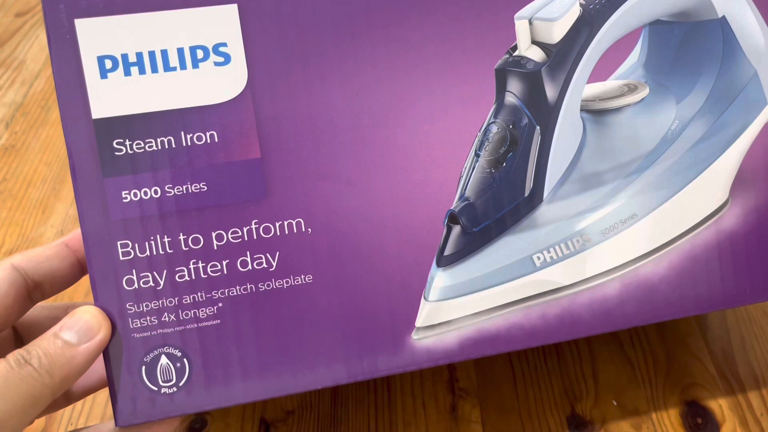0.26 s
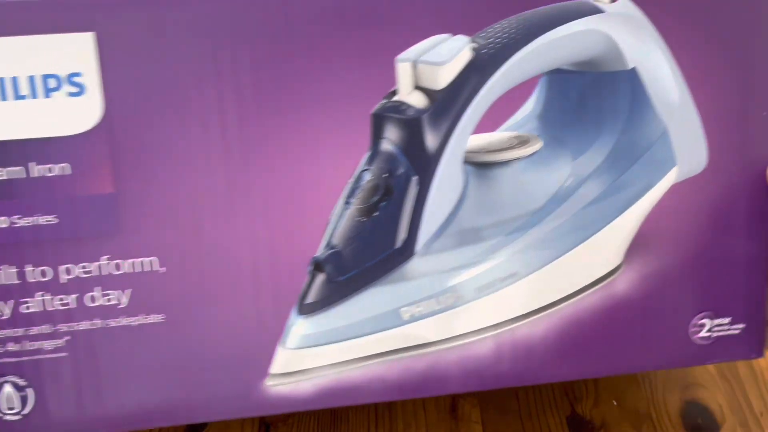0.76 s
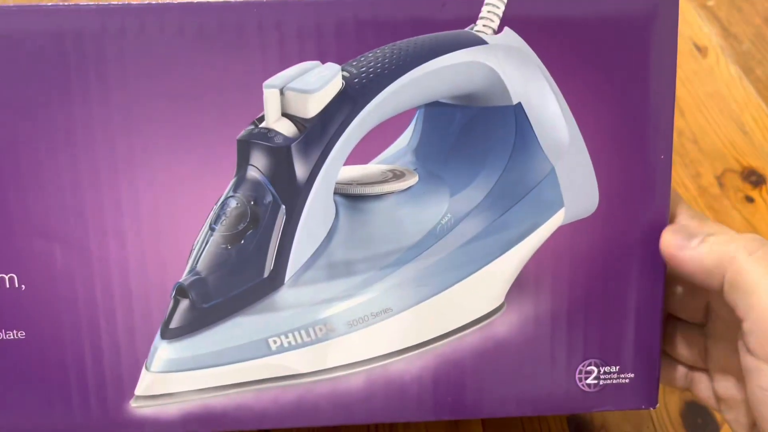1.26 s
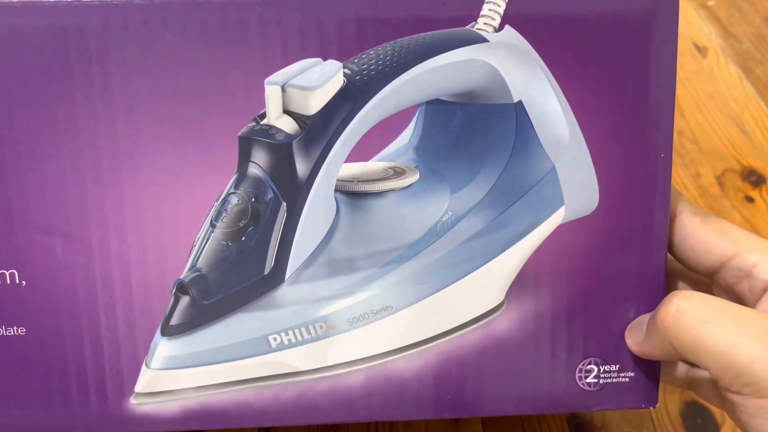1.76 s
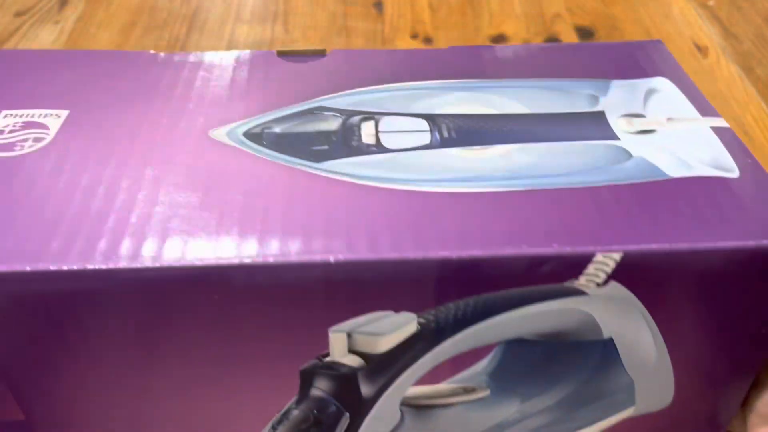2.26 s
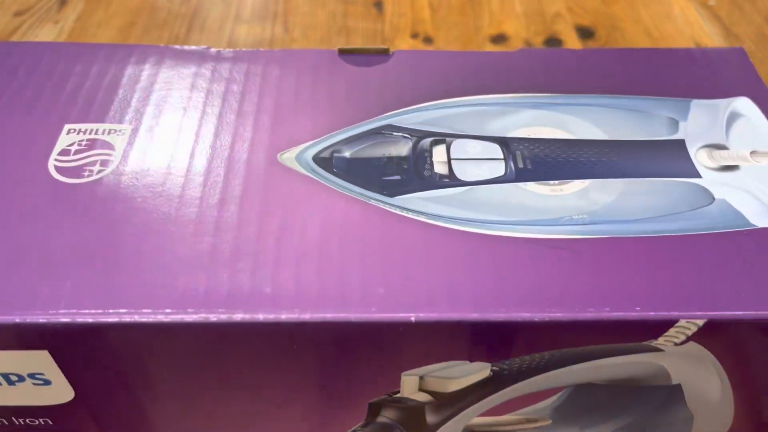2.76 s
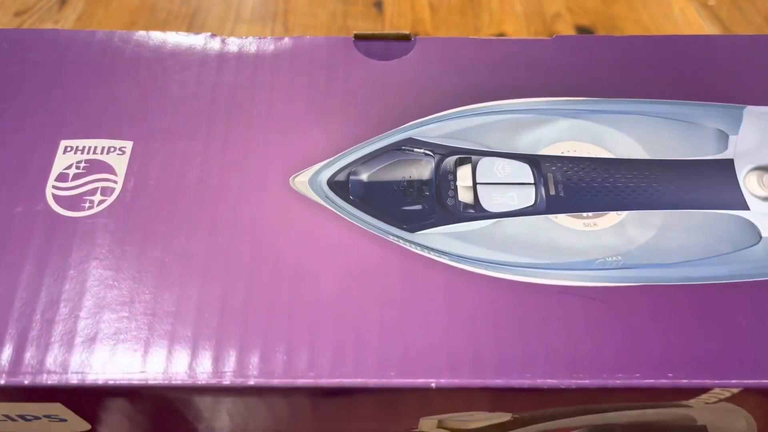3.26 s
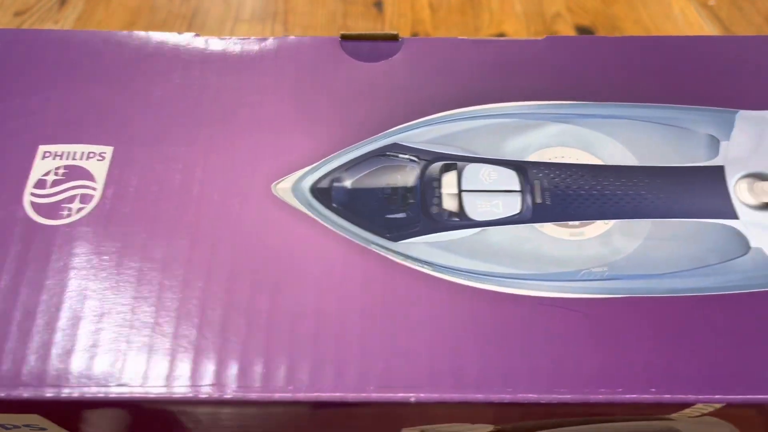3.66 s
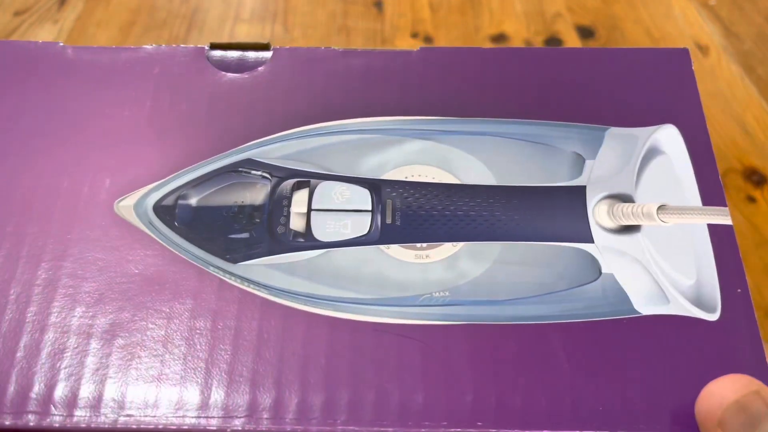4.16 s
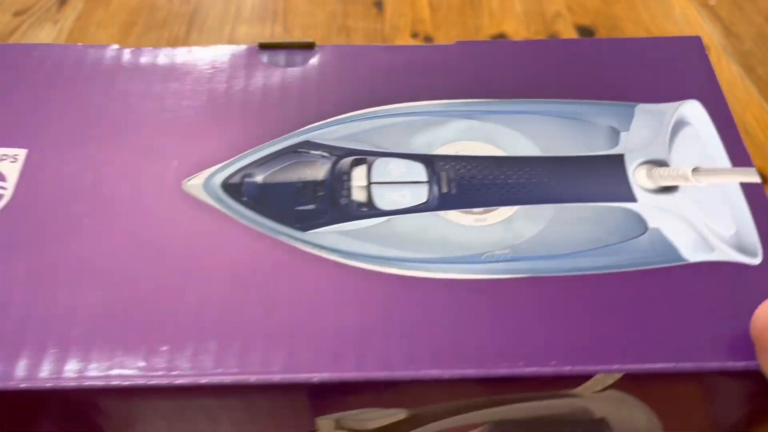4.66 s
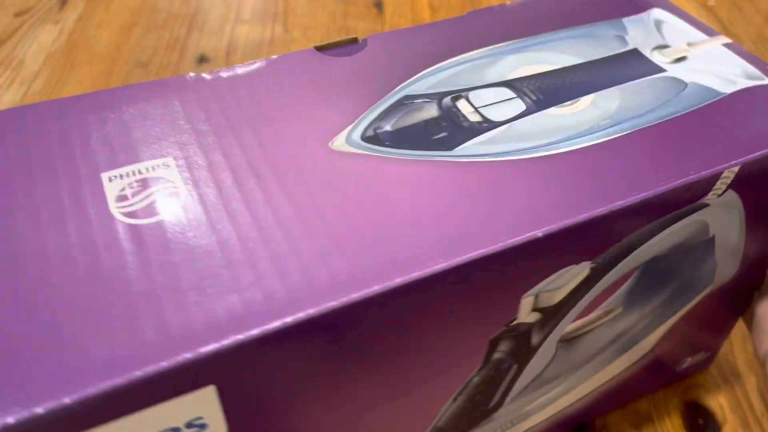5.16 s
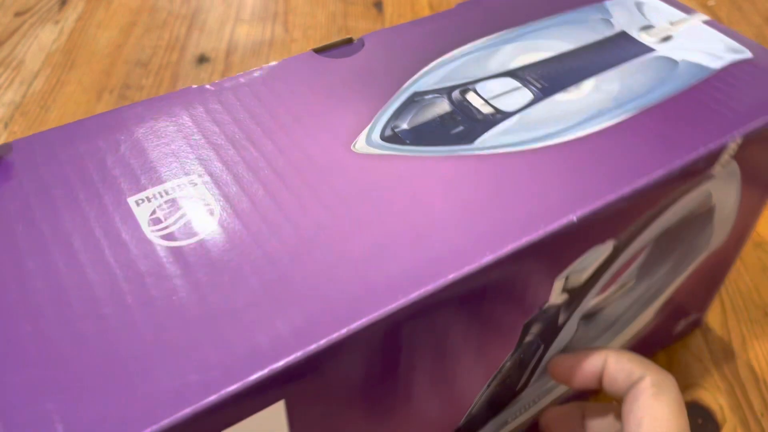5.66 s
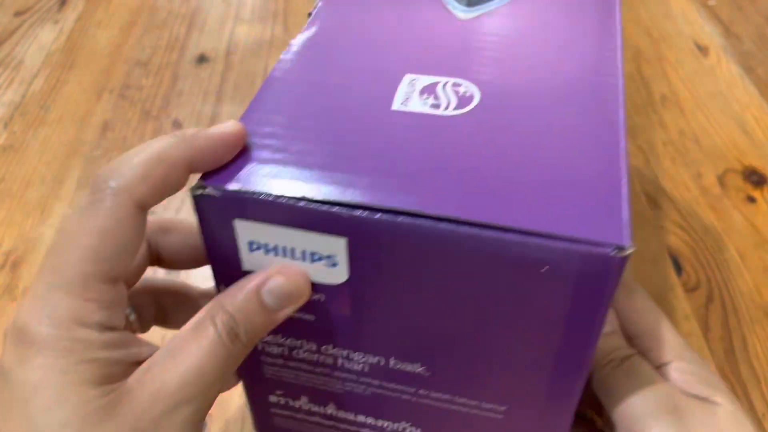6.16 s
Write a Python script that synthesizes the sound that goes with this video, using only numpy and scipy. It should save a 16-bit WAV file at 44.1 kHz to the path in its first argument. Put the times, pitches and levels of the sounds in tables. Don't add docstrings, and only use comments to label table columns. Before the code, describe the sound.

Close up in a quiet room with a faint fan hum, hands slide over a glossy cardboard box on a wooden table. Soft hissing strokes and low judders come first, separated by near-silent pauses with small pats. Later the strokes turn louder and rougher, with sharp clicks, sticky skin snaps and hollow panel thuds until the cut-off.

```python
import sys
import numpy as np
from scipy import signal
from scipy.fft import rfft, irfft
from scipy.io import wavfile
from scipy.ndimage import uniform_filter1d, map_coordinates

SR = 44100
rng = np.random.default_rng(int(sys.argv[2]) if len(sys.argv) > 2 else 0)


def store_pcm(level_fs):
    pcm = np.round(np.clip(level_fs, -1, 1) * 32767).astype(np.int16)
    wavfile.write(sys.argv[1], SR, np.atleast_2d(pcm).T)


def invert_db(x):
    u = np.asarray(x, float) / 20
    return 10 ** u


N = 282240
HZ = np.fft.rfftfreq(N, 1 / SR)
TIME = np.arange(N) / SR

# [f/Hz, level/dB]
SKIN = [(1200, -11), (2200, 0), (3500, -0.5), (5000, -5), (7200, -8.5), (8500, -14), (9700, -5.5),
        (11000, -12), (14000, -17), (16000, -21)]
# [f/Hz, width/Hz, level/dB]
BOARD = [(535, 125, -1), (653, 138, 1), (766, 173, 2.5), (966, 97, 3), (1024, 133, 2), (1357, 168, 0),
         (1690, 500, -5.5), (2370, 380, -15)]
# [f/Hz, width/Hz, level/dB]
PANEL = [(187.6, 14, 6.5), (262, 22.6, -2), (308.5, 29, -0.5), (396.3, 24.7, -3), (500, 44, -7)]
# [f/Hz, width/Hz, level/dB]
TABLE = [(60.9, 17.3, -0.5), (94.5, 15, 0.5), (130, 12, -8)]
# [f/Hz, width/Hz, level/dB]
HUM = [(51, 9.5, -59), (97.2, 8.6, -63), (147.6, 9.2, -64.5), (187.5, 6.1, -62.5), (245, 8.9, -73.5),
       (330.8, 8, -80.5)]
# [f/Hz, level/dB]
AIR = [(25, -27), (60, -2.5), (150, -10), (300, -20), (480, -28.5), (750, -24), (1050, -24.5),
       (1400, -15.5), (1750, -16), (2500, -38.5), (5000, -39), (7000, -47), (10000, -52), (16000, -60)]
# [f/Hz, likeness -1 to 1]
AIR_ALIKE = [(60, -0.23), (300, -0.63), (700, 0.24), (1400, -0.44), (3000, 0.32), (5500, 0.035),
             (8300, -0.71), (12000, 0.77), (15500, -.6)]
# [f/Hz, phase/rad]
PORT_LEAD = [(0, 0), (2000, 0), (2800, .8), (4800, .4), (6300, -.9), (7600, -2.65), (8500, -3.14),
             (9500, -3.6), (11000, -6.1), (13400, -6.5), (14900, -9.3), (16000, -9.5)]
# [f/Hz, left minus right/dB]
PORT_TILT = [(60, -3), (250, -1), (600, -4.5), (1200, 1.8), (2700, -.6), (4500, 6), (8000, 2.5),
             (15000, -1.5)]
# [f/Hz, level/dB]
ROOM_DB = [(60, -15), (300, -12), (700, -0.5), (3000, -9.5), (6000, -4.5), (8000, -13.5), (16000, -16)]
# [t/s, rub level/dB]
STROKES = [
    [(0.44, -96), (0.506, -96), (0.534, -79), (0.644, -70.5), (0.772, -74), (1.088, -81), (1.192, -93)],
    [(1.198, -77), (1.228, -80), (1.27, -105)],
    [(1.83, -75), (1.9, -78), (1.94, -79.5), (2.038, -70), (2.13, -73)],
    [(2.13, -68.5), (2.28, -67.5), (2.496, -68.5), (2.584, -70), (2.66, -74)],
    [(2.66, -74), (2.798, -71), (2.944, -77.5), (3.07, -71), (3.154, -76.5), (3.2, -98.5)],
    [(3.6, -91), (3.658, -78.5), (3.79, -73.5), (4.026, -74.5), (4.15, -86.5), (4.19, -96)],
    [(4.49, -71), (4.532, -73), (4.596, -65.5), (4.704, -64), (4.74, -56.5), (5.0, -64)],
    [(5.0, -59), (5.05, -61), (5.206, -61), (5.256, -61.5), (5.324, -63.5), (5.35, -51.5), (5.385, -79),
     (5.44, -74.5), (5.48, -104)],
    [(5.56, -85), (5.6, -61), (5.654, -67), (5.734, -57), (5.8, -55.5), (6.0, -56), (6.064, -61)],
    [(6.064, -63), (6.18, -59), (6.24, -61), (6.26, -65), (6.4, -66)],
]
# [skin gloss/dB, edge on wood/dB, panel shudder/dB]
GRIPS = [(-7, -65, -57.5), (-2, -63, -61), (-2, -65, -55), (-10.5, -69.5, -65), (-6, -70.5, -61),
         (-1.5, -72.5, -57), (-8.5, -70.5, -59.5), (-8, -68.5, -60.5), (-7.5, -64.5, -55),
         (-6.5, -61.5, -54)]
# [t/s, length/s, panel level/dB, panel f/Hz]
JUDDERS = [(0.9, 0.11, -53, 97), (0.64, 0.07, -50, 95), (0.7, 0.027, -46, 100), (0.774, 0.11, -39, 101),
           (1.84, 0.072, -54.5, 427), (5.06, 0.057, -53, 383), (5.331, 0.043, -43.5, 337),
           (5.884, 0.11, -47, 283), (6.167, 0.075, -42, 390)]
# [t/s, share of the sound]
FACE = [(0.5, 0.35), (2.5, 0.084), (2.75, 0.21), (4.1, 0.42), (4.55, 0.1), (4.76, 0.13), (4.95, 0.29),
        (5.1, 0.12), (6.4, 0.025)]
# [t/s,
# length/s, level/dB, f/Hz]
HOLLOWS = [(0.59, 0.18, -69, 1130), (5.1, .005, -52, 3900), (5.5896, 0.0036, -36.5, 2300),
           (4.652, .004, -58, 4800), (1.872, 0.013, -57, 980), (6.076, 0.017, -49.5, 1060),
           (1.203, 0.01, -77, 2500), (6.222, 0.021, -64, 4000), (2.55, .25, -75, 3500),
           (5.8, 0.021, -63, 2250), (4.58, 0.043, -69, 3550), (1.9, 0.095, -78, 4600), (2, 0.33, -81, 3300),
           (2.76, 0.41, -81, 2650), (4.54, .07, -74, 2460), (4.7, 0.18, -63.5, 2540),
           (4.725, 0.106, -63, 1670), (4.7, 0.28, -76, 6400), (4.6, 0.064, -76, 2830),
           (2.06, 0.088, -59, 810), (5.211, .008, -54, 1400), (5.4225, .003, -61, 6500),
           (5.2485, .003, -54, 3600), (.68, .1, -66, 600), (.58, 0.17, -78.5, 2880), (2.2, .4, -79.5, 3670),
           (4.9, 0.027, -64, 6500), (5.341, .022, -58, 3000), (5.285, .075, -65, 13700),
           (5.243, 0.052, -53.5, 800), (5.79, 0.29, -61, 1340), (6.185, 0.079, -54.5, 1300)]
# [t/s, panel level/dB, panel f/Hz, crack level/dB]
PATS = [(0.449, -53.5, 228, -57.5), (0.512, -42, 230, -53.5), (1.009, -39, 334, -52.5),
        (1.129, -49.5, 244, -52.5), (1.653, -47.5, 245, -64), (1.701, -49.5, 320, -82),
        (1.839, -41, 380, -48.5), (1.888, -39.5, 428, -64), (1.929, -34.5, 245, -50.5),
        (2.128, -51, 307, -45), (2.686, -36.5, 259, -54.5), (2.79, -37.5, 282, -74), (2.879, -44, 230, -64),
        (2.927, -40.5, 382, -72), (3.799, -35.5, 281, -51.5), (4.414, -60, 240, -80),
        (5.096, -39.5, 414, -54), (5.339, -39, 310, -50), (5.532, -51, 230, -68), (5.945, -32.5, 435, -43),
        (6.077, -25.5, 437, -37), (6.087, -45, 467, -49), (6.192, -40, 383, -39), (6.236, -44, 350, -49),
        (6.394, -49, 237, -49)]
# [t/s, panel level/dB, panel f/Hz, tick level/dB]
CLICKS = [(1.839, -50, 300, -63), (6.226, -52, 380, -62), (6.239, -49, 350, -60), (0.76, -42, 270, -61.5),
          (1.205, -49.5, 480, -73), (1.875, -37, 312, -55.5), (2.283, -46, 252, -60),
          (2.953, -50, 320, -60), (3.662, -51.5, 505, -63.5), (4.492, -44, 238, -65),
          (4.6518, -38, 384, -50.5), (4.846, -31.5, 343, -54.5), (4.95, -26, 339, -52),
          (5.0425, -38.5, 507, -56), (5.055, -30.5, 357, -48.5), (5.168, -37.5, 317, -52.5),
          (5.212, -46, 398, -59), (5.25, -38.5, 356, -57), (5.352, -47, 320, -53), (5.422, -71, 302, -69),
          (5.483, -68, 234, -84), (5.564, -36.5, 305, -56.5), (5.588, -33, 403, -49),
          (5.5912, -28, 407, -41.5), (5.597, -46, 313, -56), (5.904, -34.5, 245, -50),
          (5.984, -24.5, 320, -43.5)]
# [t/s, rumble level/dB]
DRAG = [(0, -60), (0.45, -57), (0.64, -43.5), (0.89, -41), (1.1, -58.5), (1.9, -60.5), (2.14, -51),
        (2.76, -55), (2.91, -48.5), (3.1, -57), (3.8, -53.5), (4.45, -60), (4.87, -47), (5.3, -50),
        (5.52, -54), (5.64, -40.5), (5.9, -48), (6.2, -42.5), (6.4, -53.5)]
# [t/s, length/s, level/dB, centre f/Hz]
LURCHES = [(0.483, 0.062, -56.5, 262), (2.073, 0.12, -47.5, 320), (2.687, 0.043, -57, 420),
           (3.721, 0.078, -54, 300), (3.807, 0.053, -50.5, 250), (0.604, .3, -54, 238),
           (5.334, 0.061, -50.5, 320), (4.834, 0.068, -48.5, 224), (4.953, .04, -47, 197),
           (5.044, 0.12, -45.5, 248), (5.241, 0.059, -47, 330), (5.655, 0.11, -51, 262),
           (6.14, 0.13, -45.5, 295)]
# [t/s, length/s, peak level/dB, f/Hz]
SWELLS = [(0.637, .03, -41.5, 98), (0.68, 0.015, -41, 208), (.761, 0.018, -52, 556),
          (0.799, 0.025, -33, 106.5), (.918, 0.017, -47, 120), (1.01, 0.015, -45.5, 436),
          (1.8395, .012, -39, 330), (1.93, .01, -38, 300), (3.66, .01, -50, 620), (3.799, .018, -41, 260),
          (5.339, .022, -38, 310), (4.651, 0.0097, -39.5, 534), (5.21, 0.018, -48, 525),
          (5.339, .016, -48.5, 527), (5.588, 0.012, -33.5, 548), (5.589, 0.0064, -40, 1060),
          (5.612, 0.029, -39.5, 239), (5.608, 0.032, -38.5, 141), (6.095, 0.011, -41.5, 500),
          (6.178, 0.032, -44.5, 565), (6.225, 0.021, -45, 902), (2.09, .032, -38, 339),
          (2.091, 0.03, -37.5, 216), (2.124, 0.019, -39, 190), (2.128, .008, -46.5, 817),
          (2.142, 0.013, -37, 300), (2.15, 0.013, -42, 181), (2.164, 0.016, -40, 237),
          (4.654, 0.014, -34.5, 394), (4.852, 0.021, -38.5, 224), (5.271, 0.016, -41, 333),
          (5.288, 0.017, -42, 330), (5.352, 0.017, -39, 298), (5.5923, .0155, -20.5, 318),
          (5.673, 0.013, -43.5, 328), (5.73, 0.014, -41, 202), (5.774, 0.014, -42, 253),
          (5.828, .014, -41.5, 360), (6.022, 0.014, -41, 256), (6.083, 0.015, -34.5, 135),
          (6.11, 0.017, -42, 120), (6.138, .02, -43, 280), (6.174, 0.026, -28, 400),
          (6.176, 0.034, -32.5, 211), (6.206, 0.012, -30, 400), (6.224, 0.027, -31.5, 390),
          (6.236, 0.029, -37, 169), (6.285, 0.017, -44.5, 302), (6.355, 0.017, -47, 260)]
# [t/s, peak level/dB, ring f/Hz]
SNAPS = [(1.2034, -63, 2550), (1.838, -54, 2320), (1.871, -47, 2620), (2.953, -50.5, 2520),
         (3.6624, -61, 2920), (3.7394, -63, 3350), (4.4914, -48, 4500), (4.5865, -49, 2600),
         (4.6509, -47, 5050), (4.9044, -51, 6600), (4.9831, -51, 2050), (5.019, -46, 3570),
         (5.0419, -41, 2130), (5.2489, -51, 2110), (5.3418, -43, 2380), (5.3524, -46, 2020),
         (5.4114, -64, 2300), (5.4229, -60, 3070), (5.492, -68, 2040), (5.5628, -46, 5260),
         (5.5879, -33.5, 2300), (5.7139, -47, 3350), (5.896, -36, 2410)]

AIR_DB = -64.5
ROOM_T60_S = 0.19
FACE_LAG_S = .0009
PAT_TICK_DB, CLICK_CRACK_DB = -31, 4.5
PAT_DULL_HZ, RING_S = 1220, 0.039
SCUFF_DB, SCUFF_S = -16, .004
EDGE_PER_DB, SHUDDER_PER_DB, USUAL_DB = 0.7, 0.6, -68.5
SWELL_LATE = 1.13
SNAP_S, SNAP_DB, SNAP_EDGE = 0.00075, -0.5, 1.1
HOLLOW_PER_DB = .012


def unit(x):
    return x / np.sqrt(np.mean(x ** 2))


def read(table):
    hz, value = np.transpose(table)
    return np.interp(np.log(HZ + 1), np.log(hz + 1), value)


def curves(table):
    s, *columns = np.transpose(table)
    return [np.interp(TIME, s, column) for column in columns]


def ring(x, modes, flip=-1):
    s = 1j * np.fft.rfftfreq(x.shape[-1], 1 / SR)
    gain = 0
    for k, (hz, width, db) in enumerate(modes):
        gain = gain + flip ** k * invert_db(db) * s * width / (s * s + s * width + hz * hz)
    return irfft(rfft(x) * gain, x.shape[-1])


def walk(rate):
    k = int(SR / rate)
    steps = np.repeat(rng.standard_normal(N // k + 1), k)
    return 0.88 * uniform_filter1d(uniform_filter1d(steps, k), k)[:N]


def slips(rate, spread_db, grip_db):
    slip = rng.random(N) < rate / SR
    strength = invert_db(spread_db * np.minimum(rng.exponential(size=N), 5))
    return slip * strength * rng.standard_normal(N) * invert_db(grip_db * walk(30))


def add(out, push, s, length, db, modes, fade_s, bend=None):
    at = slice(int(s * SR), int((s + length) * SR))
    t = TIME[at] - s
    rung = unit(ring(push[at], modes))
    if bend is not None:
        place = np.cumsum(1 + bend[at] - bend[at].mean())
        rung = map_coordinates(rung, [place], mode="mirror")
    out[at] += invert_db(db) * np.clip(np.minimum(t, length - t) / fade_s, 0, 1) * rung


def fan():
    alike = np.clip(read(AIR_ALIKE), -.99, .99)
    noise = rfft(rng.standard_normal((2, N))) * invert_db(read(AIR))
    mid, side = noise * np.sqrt([1 + alike, 1 - alike])
    air = invert_db(AIR_DB) * unit(irfft(np.array([mid + side, mid - side]), N))
    push = rng.standard_normal((3, N))
    push = push[0] + 0.17 * push[1:]
    hum = 0
    for hz, width, db in HUM:
        tone = ring(ring(push, [(hz, width, 0)]), [(hz, 3 * width, 0)])
        hum = hum + invert_db(db) * unit(tone)
    return air + hum * invert_db(1.4 * walk(2.9))


def rubbing():
    rub_db, = curves(np.vstack(STROKES))
    starts = [s[0][0] for s in STROKES]
    stroke = np.clip(np.searchsorted(starts, TIME) - 1, 0, None)
    gloss_db, edge_db, shudder_db = uniform_filter1d(np.transpose(GRIPS)[:, stroke] * 1., size=1500)
    contact = sum((TIME > s[0][0]) * (TIME <= s[-1][0]) * 1. for s in STROKES)
    touching = uniform_filter1d(contact, size=300)
    effort = rub_db - USUAL_DB - 25 * (1 - touching)
    return touching, rub_db, gloss_db, edge_db + EDGE_PER_DB * effort, shudder_db + SHUDDER_PER_DB * effort


def shaking():
    panel_db, table_db = rubbing()[-1], curves(DRAG)[0]
    push = slips(1200, 1.6, 2.3)
    out = unit(ring(ring(push, PANEL), [(320, 370, 0)])) * invert_db(panel_db)
    wobble = np.cumsum(1 + 0.0717 * walk(60)) / SR
    for s, length, db, hz in JUDDERS:
        locked = np.sin(2 * np.pi * hz * wobble) + 0.77 * np.sin(2 * np.pi * .56 * hz * wobble)
        modes = [(hz, 0.61 * hz, 0), (0.62 * hz, 0.35 * hz, -2), (1.3 * hz, .5 * hz, -6)]
        add(out, locked + .5 * unit(push), s, length, db, modes, 3.5 / hz)
    loose = slips(3000, 1.3, 3.6)
    for s, length, db, hz in LURCHES:
        modes = [(0.6 * hz, 0.3 * hz, 0), (1.153 * hz, 0.45 * hz, 0), (1.565 * hz, 0.6 * hz, -6)]
        add(out, loose, s, length, db, modes, .015)
    table = ring(ring(slips(600, 1.2, 2.0), TABLE, flip=0.94), [(84, 177, 0)])
    return out + unit(table) * invert_db(table_db - 2.5)


def swells():
    out = np.zeros(N)
    for s, length, db, hz in SWELLS:
        t = np.arange(int(length * SR)) / SR
        shape = np.sin(np.pi * (t / length) ** SWELL_LATE) ** 0.81
        tone = np.sin(2 * np.pi * hz * t * (1 - .03 * t / length))
        out[int(s * SR):][:len(t)] += invert_db(db) * shape * tone
    return out


def snaps():
    out, t = np.zeros(N), np.arange(SR // 200) / SR
    for s, db, hz in SNAPS:
        turn = 2 * np.pi * hz * t
        tones = np.sin(turn) + 0.32 * np.sin(2.3 * turn) + 0.58 * np.sin(0.454 * turn)
        crack = np.exp(-t / SNAP_S) * tones
        crack[:3] += SNAP_EDGE * np.array([1, -1.2, .4])
        out[int(s * SR):][:len(t)] += invert_db(db + SNAP_DB) * crack
    return out


def knocks():
    ticks, thuds, soft, hard = np.zeros((4, N + SR))
    t = np.arange(SR // 5) / SR
    blow = np.sin(np.pi * np.clip(t / .0007, 0, 1))
    sag = t + 0.00084 * (1 - np.exp(-t / 0.0049))
    swing = (1 - np.exp(-(t / .002) ** 2)) * np.exp(-np.log(1000) * t / RING_S)
    tick_shape = 1.62 * np.exp(-t / 0.001) + 0.14 * np.exp(-t / 0.006)
    grit_shape = .5 * np.exp(-t / 0.005) + 0.48 * np.exp(-t / 0.0061)
    late = t / 0.0093 * np.exp(1 - t / 0.0062)
    pats = [(s, db, hz, crack, crack + PAT_TICK_DB, soft) for s, db, hz, crack in PATS]
    clicks = [(s, db, hz, tick + CLICK_CRACK_DB, tick, hard) for s, db, hz, tick in CLICKS]
    for s, panel_db, hz, crack_db, tick_db, cracks in pats + clicks:
        at = slice(int(s * SR), int(s * SR) + len(t))
        grit = rng.standard_normal((2, len(t)))
        ticks[at] += invert_db(tick_db) * grit[0] * tick_shape
        cracks[at] += invert_db(crack_db) * (1.04 * blow + grit[1] * grit_shape)
        pair = np.sin(2 * np.pi * hz * sag) + 0.31 * np.sin(2 * np.pi * 1.314 * hz * sag)
        thuds[at] += invert_db(panel_db) * swing * pair
        thuds[at] += invert_db(panel_db - 10) * late * np.sin(2 * np.pi * 0.6 * hz * t)
    dulled = irfft(rfft(soft[:N]) / (1 + 1j * HZ / PAT_DULL_HZ) ** 2, N)
    crack = ring(hard[:N] + invert_db(3.5) * dulled, BOARD)
    tick_colour = HZ ** 2 / (HZ ** 2 + 1500 ** 2) / np.sqrt(1 + (HZ / 4500) ** 2)
    tick = irfft(rfft(ticks[:N]) * tick_colour, N)
    return (TIME > .1) * (invert_db(9.5) * tick + invert_db(12.0) * crack + invert_db(4.0) * thuds[:N])


def hollows():
    out, push = np.zeros(N), slips(12000, 2.0, 1.3)
    bend = np.clip(HOLLOW_PER_DB * (rubbing()[1] - USUAL_DB), -.3, .3)
    for s, length, db, hz in HOLLOWS:
        width = (0.064 + 0.00076 / length) * hz
        modes = [(0.876 * hz, width, -7), (hz, width, 0), (1.12 * hz, width, -5)]
        add(out, push, s, length, db, modes, min(.04, length / 4), bend)
    return out


def scuffs():
    s, _, _, tick_db = np.transpose(CLICKS)
    starts = np.zeros(N)
    starts[(s * SR).astype(int)] = invert_db(tick_db + SCUFF_DB)
    return signal.lfilter([1], [1, -np.exp(-1 / (SCUFF_S * SR))], starts)


def sliding():
    touching, rub_db, gloss_db, board_db, _ = rubbing()
    pressed = touching * invert_db(rub_db) + scuffs()
    rub = unit(slips(30000, 2.4, 1.8)) + invert_db(-11) * unit(slips(400, 2.5, 3.0))
    hiss = rfft(rub) * invert_db(read(SKIN))
    fine = 1 / (1 + (8300 / (HZ + 1)) ** 8)
    coarse = np.zeros(N)
    for hz in 1500 * 1.25 ** np.arange(9):
        patch = np.exp(-(np.log((HZ + 1) / hz) / .16) ** 2)
        coarse += irfft(hiss * (1 - fine) * patch, N) * invert_db(2.8 * walk(9))
    skin = unit(coarse) * pressed * invert_db(-1.0)
    skin = skin + unit(irfft(hiss * fine, N)) * pressed * invert_db(gloss_db + 3.5)
    scrape = unit(slips(6000, 1.4, 1.6)) + .4 * unit(slips(120, 3, 3))
    board = unit(ring(scrape, BOARD)) * invert_db(board_db)
    direct = skin + touching * board
    share = np.clip(curves(FACE)[0], 0, .9)
    lag = int(FACE_LAG_S * SR)
    echo = ring(direct, [(2380, 3400, 0)])
    mixed = direct - share * np.roll(echo, lag) + share ** 2 * np.roll(echo, 2 * lag)
    return mixed / np.sqrt(1 + share ** 2)


def scene():
    box = rfft(shaking() + swells() + snaps() + knocks() + hollows() + sliding())
    aside = read([(200, 0), (600, 5), (4500, 8), (7000, 0)])
    paths = []
    for turn in (-.11, .11):
        lead = (1 + .3 * turn) * read(PORT_LEAD) + turn * aside
        port = invert_db(read(PORT_TILT) / 2) * np.exp(.5j * lead)
        paths.append(irfft(box * np.array([port, 1 / port]), N))
    one, other = paths
    facing = .5 + .5 * np.tanh(2 * walk(9))
    tail = rng.standard_normal((2, SR // 2)) * np.exp(-np.log(1000) * TIME[:SR // 2] / ROOM_T60_S)
    tail = tail / np.sqrt(np.sum(tail ** 2) / 2)
    sent = irfft(box * invert_db(read(ROOM_DB)), N)
    walls = signal.fftconvolve(sent[None], tail, axes=1)[:, :N]
    return facing * one + (1 - facing) * other + walls + fan()


def band_limit(x):
    return signal.sosfilt(signal.butter(12, 15660, fs=SR, output="sos"), x)


def record(dry):
    heard = signal.sosfilt(signal.butter(3, 40, "high", fs=SR, output="sos"), dry)
    return band_limit(heard)


dry = scene()
out = record(dry)
store_pcm(out)
```